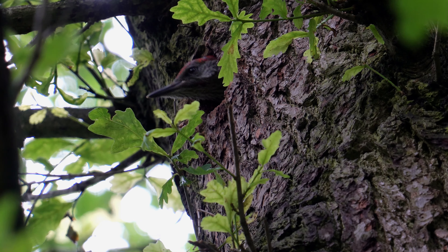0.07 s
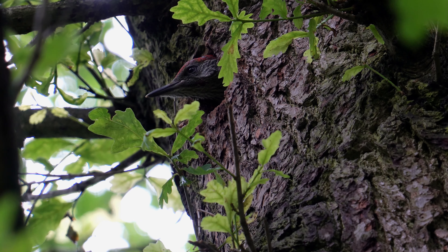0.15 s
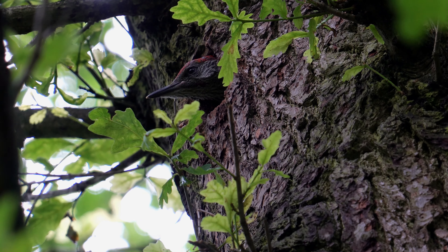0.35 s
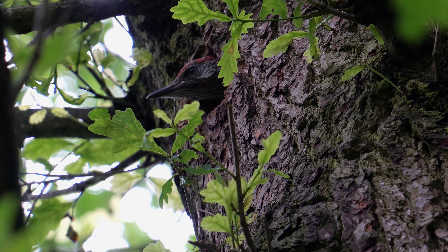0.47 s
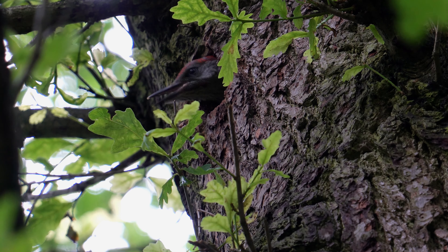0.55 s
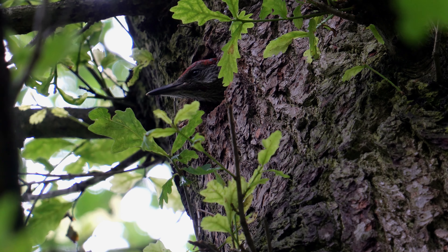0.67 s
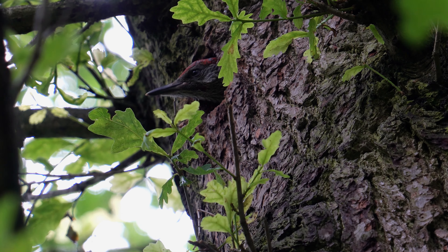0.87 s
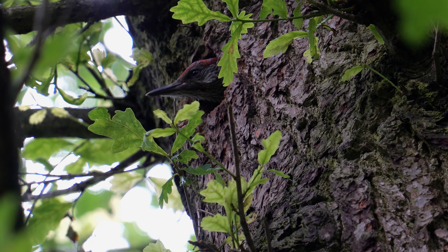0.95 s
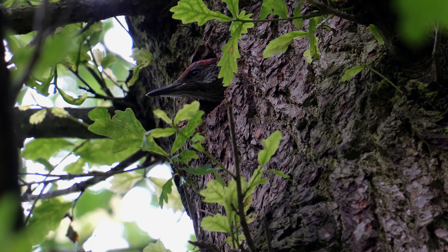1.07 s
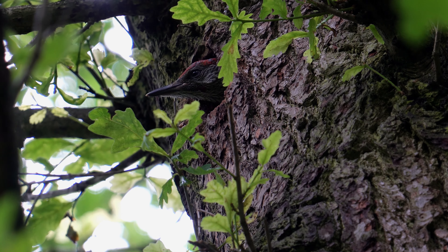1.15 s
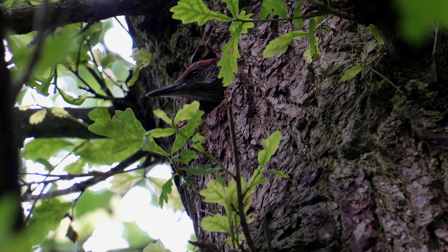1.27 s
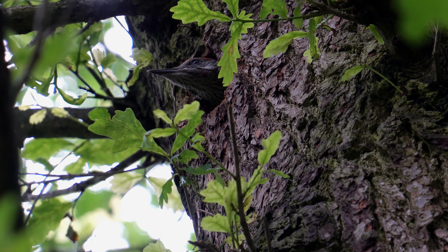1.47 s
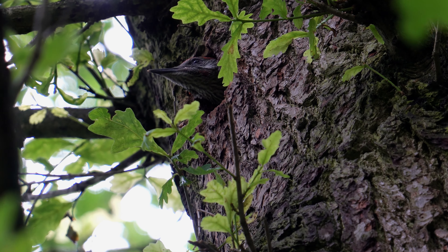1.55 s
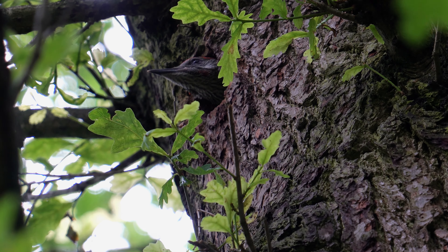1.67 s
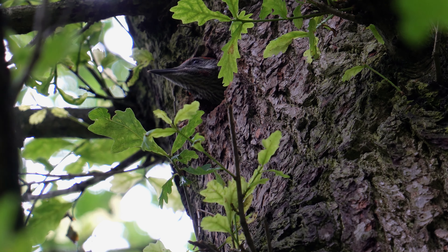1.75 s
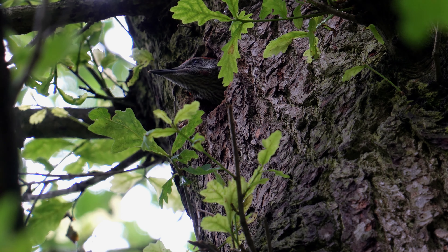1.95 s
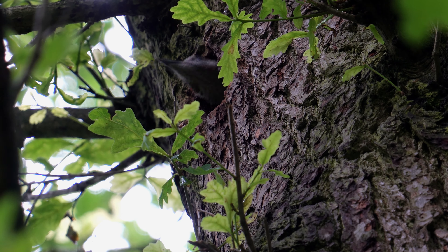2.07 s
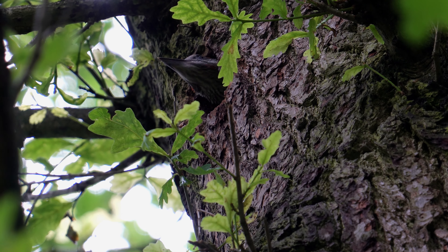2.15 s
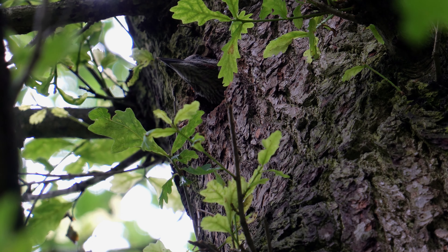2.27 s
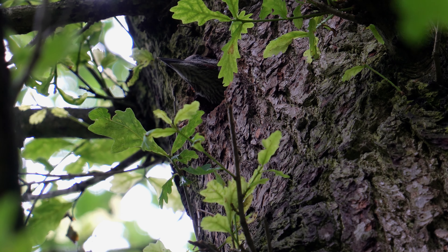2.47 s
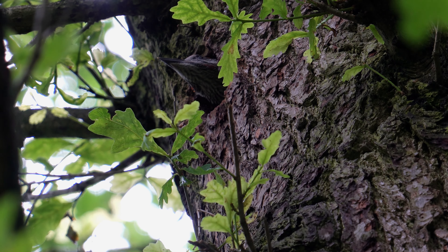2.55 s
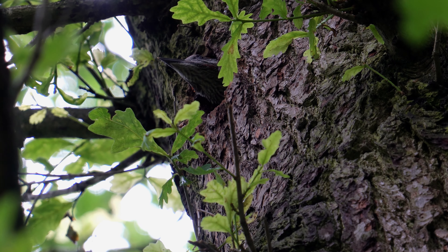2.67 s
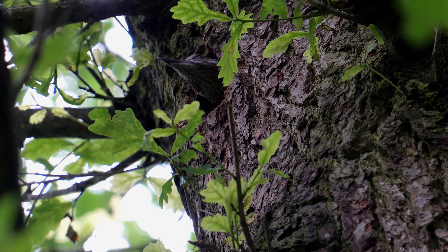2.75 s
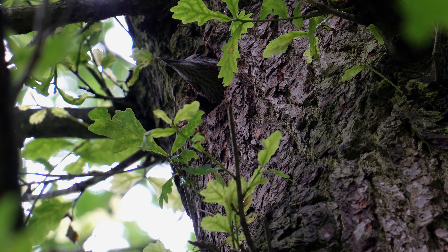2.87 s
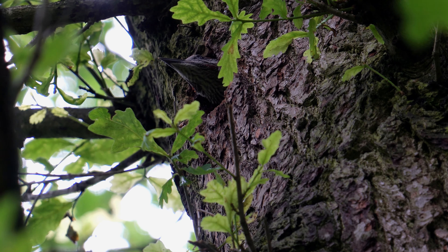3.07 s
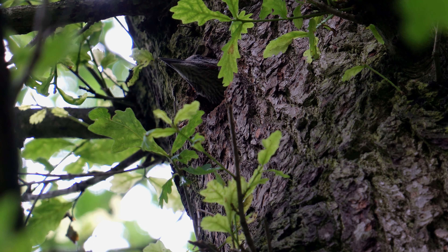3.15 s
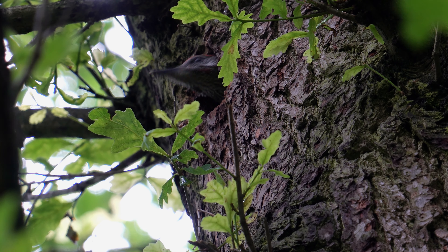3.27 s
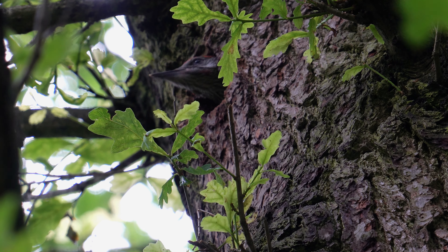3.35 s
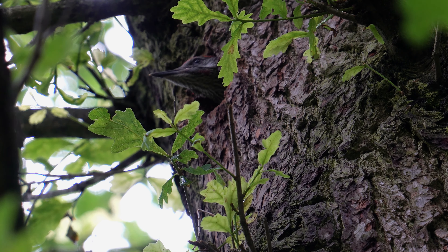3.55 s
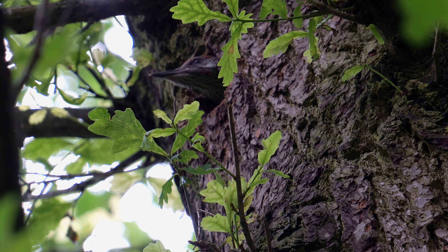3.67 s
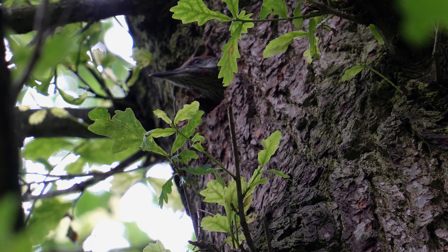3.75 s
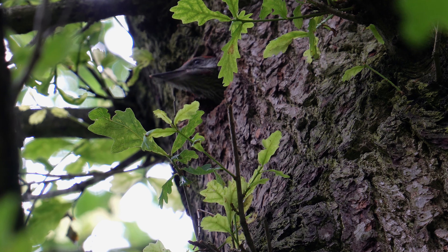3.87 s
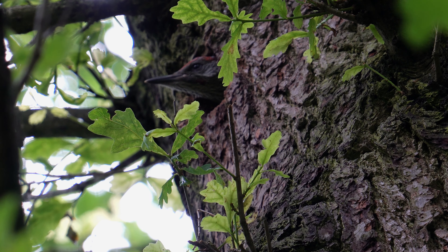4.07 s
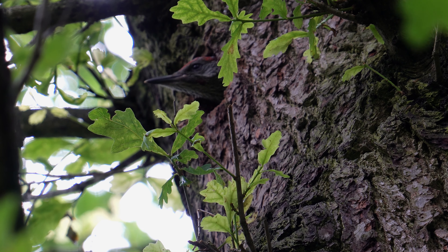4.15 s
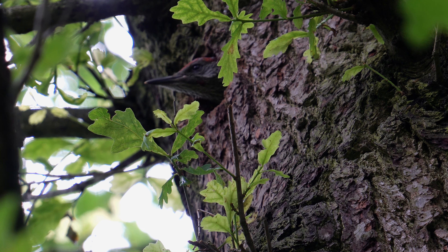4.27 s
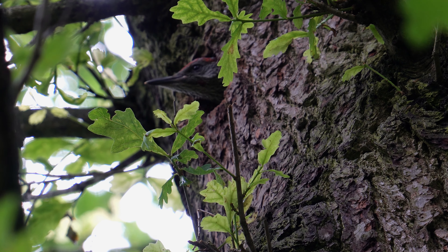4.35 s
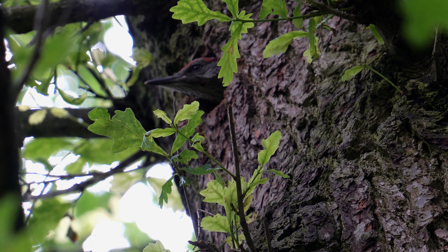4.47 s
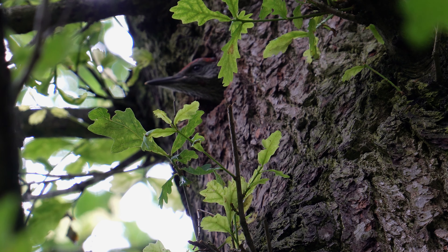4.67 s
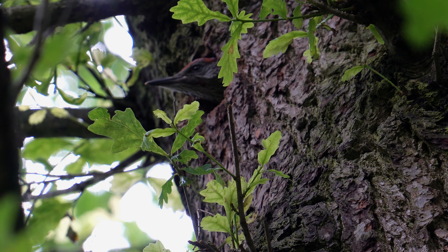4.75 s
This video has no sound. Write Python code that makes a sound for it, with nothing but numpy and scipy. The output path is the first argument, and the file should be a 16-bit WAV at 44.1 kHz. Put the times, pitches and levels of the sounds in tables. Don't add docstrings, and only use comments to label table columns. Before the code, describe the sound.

A young woodpecker in a tree hole gives thirteen loud, clipped begging calls, each a tiny rasp snapping into a clear piercing note that drops quickly. They come singly, unevenly spaced over nearly ten seconds, with short woodland echoes. Behind, songbirds flute, warble, slide and buzz, blurred by the trees. A soft broadband hush and a very faint low motor drone lie underneath. The chick is clear and fairly close; the other birds are farther off and wide.

```python
import sys
import numpy as np
from scipy import signal
from scipy.fft import rfft, irfft
from scipy.io import wavfile
from scipy.ndimage import uniform_filter1d

SR = 44100
rng = np.random.default_rng(int(sys.argv[2]) if len(sys.argv) > 2 else 0)


def dump_mix(stems):
    frames = np.atleast_2d(stems).T
    limited = np.clip(frames, -1, 1)
    pcm = np.round(limited * 32767).astype(np.int16)
    wavfile.write(sys.argv[1], SR, pcm)


def linear_from_db(decibels):
    return 10 ** (np.asarray(decibels, float) / 20)


N = 433944


def chick():
    # start of the clear tone in seconds, its pitch in Hz, pitch at the end of the hold in Hz,
    # peak level in dB, 2nd overtone (set by the gape) in dB.
    begging = [(0.073, 2410, 2343, -16, -6), (0.678, 2432, 2384, -14.5, -6.5),
               (1.474, 2382, 2002, -18, -5.5), (2.261, 2280, 2012, -21.5, 0), (3.448, 2238, 2298, -18, -4),
               (4.016, 2330, 2406, -16.5, -5.5), (5.185, 2330, 2064, -20.5, -7.5),
               (5.684, 2366, 2392, -18, -7.5), (6.288, 2395, 2290, -18, -14),
               (6.657, 2355, 2190, -16, -8.5), (7.1, 2257, 2250, -17, -6), (8.269, 2176, 2387, -16.5, -3),
               (8.846, 2223, 2420, -14, -7)]
    # 3rd overtone in dB, lift of the upper overtones in dB,
    # share sent to the trees in dB.
    aim = [(-16, -1, 2), (-22, -0.5, 2.5), (-20, -2.5, 3.5), (-18, 0.5, 2), (-17, -2, 3), (-11.5, 1.5, 2),
           (-20, 3.5, 2.5), (-9.5, 6, 3), (-13.5, 0, 4), (-22, -0.5, 2.5), (-17, 2.5, 3), (-16, 1, 4.5),
           (-15, -2.5, 3.5)]
    # hold in seconds, fall in seconds, opening rasp in dB, pace of the fall as share of usual.
    effort = [(0.021, .046, -26.5, 1.05), (.02, 0.057, -29, .95), (.02, .034, -27.5, 0.81),
              (0.021, .034, -27.5, .9), (.021, 0.0366, -29, 1.2), (.021, 0.054, -29, .95),
              (.02, 0.031, -28.5, 1.05), (.02, 0.053, -29, 1.05), (.02, .048, -28.5, 1.05),
              (0.019, 0.055, -27, 0.79), (.024, 0.048, -27, .95), (.024, 0.062, -30.5, .9),
              (0.02, 0.065, -28.5, .85)]
    # share of fall time, share of pitch drop, level in dB.
    fall_course = [(0, 0.03, -4), (0.15, .29, -8), (.4, .55, -11), (.65, .74, -16), (.85, .9, -24),
                   (1.25, 1.4, -38)]
    lead, usual_sag = 0.024, 18000
    direct, echoes, thrown = np.zeros(N), np.zeros((2, N)), np.zeros(N)
    share, sag, sag_db = np.transpose(fall_course)
    for event, head, strength in zip(begging, aim, effort):
        s, start_hz, end_hz, db, second_db = event
        third_db, lift_db, thrown_db = head
        hold, fall, rasp_db, pace = strength
        t = np.arange(round((lead + hold + share[-1] * fall) * SR)) / SR - lead
        knots = np.r_[-lead, -.006, 0, hold / 2, hold + share * fall]

        middle_hz = (start_hz + end_hz) / 2 * 1.0361
        falling_hz = end_hz - usual_sag * pace * fall * sag
        pitch = np.interp(t, knots, np.r_[.62 * start_hz, .83 * start_hz, start_hz, middle_hz, falling_hz])
        pitch = uniform_filter1d(pitch, size=90) * (1 + .007 * waver(N // 40, span=60)[:len(t)])
        phase = 2 * np.pi * np.cumsum(pitch) / SR

        tone = np.clip(t / 0.00094 + 1, 0, 1) * linear_from_db(np.interp(t, knots, np.r_[-9, -9, -4, 0, sag_db]))
        slackening = np.clip((t - hold) / fall * 3, 0, 1)
        tone *= linear_from_db(2 * slackening * waver(N // 40, span=110)[:len(t)])
        closed = np.interp(t, [0, hold * 0.6, hold, hold + fall / 2], [.5, 0, 3, 9])
        call = overtones(phase, tone, closed, second_db, third_db, lift_db)

        slack_s = [-lead, -.014, -.001, .008, hold + 0.038 * fall, hold + 1.35 * fall, t[-1]]
        slack_db = np.interp(t, slack_s, [-34, -8, 1, -10, -24, -20, -35])
        rasp, air = rasp_and_air(pitch, phase)
        call += linear_from_db(rasp_db - db + slack_db) * (rasp + linear_from_db(-19) * air)
        call += linear_from_db(-26) * tone * air
        call = linear_from_db(db) * call * fade(t + lead, t[-1] + lead, 0.00037)
        call = signal.sosfilt(signal.butter(3, [480, 14000], "band", fs=SR, output="sos"), call)
        add(direct, s - lead, call)

        call = call * linear_from_db(thrown_db + np.interp(t, [hold, hold + fall / 2], [0, -3]))
        add(thrown, s - lead, call)
        for ear, echo in zip(echoes, trunk_echoes(call)):
            add(ear, s - lead, echo)
    return direct, echoes, thrown


def overtones(phase, tone, closed, second_db, third_db, lift_db):
    upper_db = [-19, -26.5, -26]
    call = tone * np.sin(phase)
    for k, level_db in enumerate([second_db, third_db, *(lift_db + np.array(upper_db))], 2):
        beak_db = -1.5 * (k - 1) ** 0.61 * closed
        call += tone * linear_from_db(level_db + beak_db) * np.sin(k * phase + k)
    return call


def rasp_and_air(pitch, phase):
    # frequency in Hz, level in dB.
    throat = [(750, -6), (1200, -11), (2000, -3), (2800, 2), (3700, 4), (5000, -4), (8000, -14),
              (15000, -26)]
    count = len(phase)
    wobble = phase / 2 + .35 * np.cumsum(rng.standard_normal(count)) / 10
    rasp = np.zeros(count)
    for k in range(1, 15):
        rasp += linear_from_db(at_hz(throat, k * pitch / 2)) * np.cos(k * wobble + k ** 2 / 2)
    air = signal.lfilter([1, -1], [1, -.8], rng.standard_normal(count)) * (1 + np.sin(wobble))
    return rasp, air


def trunk_echoes(call):
    # delay in seconds, level in dB, spread in seconds.
    trunks = [
        (.0075, -14, 0.0006),
        (.016, -18, 0.0071),
        (0.051, -20, 0.003),
        (.075, -26, 0.025),
    ]
    t = np.arange(round(.1 * SR)) / SR
    shape = np.zeros(len(t))
    for lag, db, spread in trunks:
        shape += linear_from_db(db) * np.exp(-((t - lag) / spread) ** 2) / np.sqrt(spread * SR)
    mid, side = shape * rng.standard_normal((2, len(t))) * linear_from_db([[0], [-13]])
    return signal.fftconvolve(call[None], np.array([mid + side, mid - side]), axes=1)


def bark_lean(voice):
    treble = signal.sosfilt(signal.butter(2, 6000, "high", fs=SR, output="sos"), voice)
    return linear_from_db(-5) * np.roll(treble, round(.0004 * SR)) * [[1], [-1]]


def near_birds():
    # start in seconds, length in seconds, top in Hz, end in Hz, level in dB.
    fluting = [
        (0.58, 0.051, 2897, 2200, -50),
        (0.697, 0.081, 2297, 2245, -32.5),
        (1, 0.11, 2133, 1974, -35.5),
        (7.665, 0.077, 2130, 1960, -36.5),
        (7.94, 0.15, 2325, 2097, -33),
        (9.331, 0.074, 2200, 1760, -49),
        (0.49, 0.14, 8400, 6840, -56),
        (0.736, 0.14, 8400, 7560, -53),
    ]
    # start in seconds, length in seconds, start in Hz, end in Hz, level in dB.
    slides = [(7.29, .14, 2030, 1650, -45), (7.54, .055, 2010, 1980, -40), (7.59, .08, 1900, 1850, -39.5),
              (7.8, .055, 2800, 2200, -46), (7.835, .02, 2800, 2400, -45), (.29, .09, 8050, 8700, -59),
              (.9, .11, 7950, 8400, -63), (2.18, .04, 4600, 2700, -46), (2.805, .025, 3600, 3300, -49),
              (4.783, .008, 6600, 8700, -43), (8.55, .01, 5900, 8000, -44), (1.768, .005, 4100, 3600, -42),
              (1.8, .012, 5200, 3800, -44), (.2, .105, 1870, 1880, -39), (.375, .035, 1880, 1900, -39),
              (.415, .05, 1900, 1890, -41), (.48, .1, 1890, 1870, -43), (9.77, .045, 1950, 2100, -47.5),
              (9.755, .028, 1650, 1620, -48), (1.35, .035, 2400, 3000, -54), (1.385, .04, 2950, 2500, -56),
              (8.495, .035, 2700, 2890, -47), (8.515, .085, 2890, 2870, -44), (8.585, .07, 2870, 2870, -48)]
    # start in seconds, length in seconds, low pitch in Hz, high pitch in Hz, level in dB.
    warbles = [
        (.622, 0.042, 1810, 2800, -37.5),
        (1.09, 0.21, 1883, 2130, -35.5),
        (1.3, 0.22, 1786, 2200, -45),
    ]
    arches = [(s, length, 0.915 * top, top, end, db) for s, length, top, end, db in fluting]
    notes = arches + slurs(slides, .5)
    song = whistles(notes, edge=.015, tremor=.003, flicker_db=1.5)
    return song + trills(warbles, per_s=44, unevenness=0.414, shape=3.1)


def far_birds():
    # start in seconds, length in seconds, pitch in Hz, level in dB.
    held = [(0, 0.0078, 4080, -29.5), (0.662, 0.083, 7380, -48), (1.366, 0.085, 3710, -45),
            (1.555, 0.12, 5870, -42), (1.701, 0.17, 5946, -40.5), (1.883, 0.18, 4050, -43.5),
            (2.151, 0.11, 7510, -39.5), (2.45, 0.29, 7350, -60), (2.626, 0.083, 8390, -46.5),
            (2.702, 0.22, 3753, -52), (3.012, 0.14, 7270, -55), (3.301, 0.066, 5350, -45),
            (3.617, 0.49, 8680, -52.5), (4.118, 0.14, 5850, -42.5), (4.198, 0.15, 6480, -54),
            (4.252, 0.098, 3974, -48), (4.293, 0.084, 8000, -56), (4.437, 0.41, 7240, -57),
            (6.357, 0.32, 4940, -47.5), (6.726, 0.15, 4870, -46.5), (6.899, 0.26, 6810, -49.5),
            (7.729, 0.15, 6055, -42), (7.912, 0.12, 3130, -52), (8.08, 0.035, 7790, -52.5),
            (8.679, 0.011, 7340, -35), (8.734, 0.073, 6080, -40.5), (9.006, 0.16, 4930, -40)]
    # start in seconds, length in seconds, start in Hz, end in Hz, level in dB.
    falling = [(.1, 0.075, 7260, 5680, -40), (1.17, 0.19, 7800, 6870, -48),
               (2.11, 0.042, 8020, 7100, -39.5), (2.48, 0.1, 5820, 5400, -39),
               (1.67, 0.0029, 7960, 6130, -35), (1.852, 0.0028, 8100, 6350, -35.5),
               (2.62, .1, 7400, 7000, -49.5), (3.57, 0.034, 9200, 7300, -39.5),
               (3.77, 0.0082, 9000, 7140, -33.5), (4.1, 0.036, 6400, 5750, -35.5),
               (4.56, 0.056, 5570, 4220, -46), (4.68, 0.053, 6430, 5370, -39.5),
               (4.76, 0.014, 5680, 4200, -34), (5.59, 0.1, 8160, 7130, -43),
               (5.89, 0.056, 4740, 4410, -41.5), (6.07, 0.098, 4310, 3530, -47),
               (6.42, 0.11, 7200, 6640, -42.5), (6.72, 0.2, 7280, 6710, -45),
               (7.01, 0.074, 5660, 4370, -35.5), (7.11, 0.12, 4430, 3580, -48),
               (7.69, 0.051, 7900, 5950, -43.5), (8.11, 0.14, 5540, 3990, -43),
               (8.33, 0.038, 5530, 4540, -34.5), (8.59, 0.058, 4430, 3720, -40.5),
               (8.7, 0.03, 7370, 6040, -44), (9.15, 0.088, 7770, 7420, -42.5)]
    # start in seconds, length in seconds, start in Hz, end in Hz, level in dB.
    rising = [(.02, 0.04, 7280, 7730, -36.5), (1.12, 0.051, 7280, 7800, -36),
              (2.02, 0.058, 4670, 5340, -37.5), (2.85, 0.064, 4440, 5730, -44),
              (3.35, 0.021, 6370, 8400, -38), (4.58, 0.032, 5980, 6670, -36.5),
              (5.54, 0.042, 7030, 7840, -37.5), (5.98, 0.035, 5600, 6260, -39),
              (6.18, 0.0336, 5150, 5770, -38), (9.52, 0.064, 6000, 7340, -41),
              (9.62, 0.056, 3930, 5050, -39), (9.7, 0.04, 7100, 7940, -37)]
    # start in seconds, length in seconds, low pitch in Hz, high pitch in Hz, level in dB.
    buzzes = [
        (.18, 0.96, 4358, 5800, -39.5),
        (3.55, 0.45, 4090, 5490, -44.5),
        (4.8, 0.78, 4186, 5787, -40),
        (7.25, 0.44, 3490, 4466, -48),
    ]
    level_notes = [(s, length, hz, hz, hz, db) for s, length, hz, db in held]
    notes = level_notes + slurs(falling, 0.57) + slurs(rising, .65)
    song = whistles(notes, edge=0.0039, tremor=.009, flicker_db=0.5)
    return song + trills(buzzes, per_s=112, unevenness=.3, shape=1)


def slurs(notes, bend):
    return [(s, length, a, a + bend * (b - a), b, db) for s, length, a, b, db in notes]


def whistles(notes, edge, tremor, flicker_db):
    out = np.zeros(N)
    for s, length, start_hz, middle_hz, end_hz, db in notes:
        t = np.arange(round(length * SR)) / SR
        curve = np.polyfit([0, length / 2, length], [start_hz, middle_hz, end_hz], deg=2)
        pitch = np.polyval(curve, t) * (1 + tremor * waver(count=30000, span=300)[:len(t)])
        flicker = flicker_db * waver(count=30000, span=500)[:len(t)]
        level = linear_from_db(db + flicker) * fade(t, length, min(edge, length / 3))
        add(out, s, level * np.sin(2 * np.pi * np.cumsum(pitch) / SR))
    return out


def trills(notes, per_s, unevenness, shape):
    out = np.zeros(N)
    for s, length, low_hz, high_hz, db in notes:
        t = np.arange(round(length * SR)) / SR
        pace = per_s * (1 + unevenness * waver(count=60000, span=400)[:len(t)])
        sweep = (1 + signal.sawtooth(2 * np.pi * np.cumsum(pace) / SR, .3)) / 2
        pitch = high_hz - (high_hz - low_hz) * uniform_filter1d(sweep, size=70) ** shape
        level = linear_from_db(db) * fade(t, length, min(.05, length / 4))
        add(out, s, level * np.sin(2 * np.pi * np.cumsum(pitch) / SR))
    return out


def wood(x, direct_db, scatter_db, side_db, treble_side_db, rise, t60, high_t60):
    t = np.arange(2 * SR) / SR
    noise = rng.standard_normal((2, len(t)))
    noise = signal.sosfilt(signal.butter(2, 11000, fs=SR, output="sos"), noise)
    low = signal.sosfilt(signal.butter(2, 5000, fs=SR, output="sos"), noise)
    high = (noise - low) * linear_from_db([[0], [treble_side_db]])
    tail = low * linear_from_db(-60 * t / t60) + high * linear_from_db(-60 * t / high_t60)
    tail *= 1 - np.exp(-(t / rise) ** 2)
    tail /= np.sqrt(np.sum(tail[0] ** 2))
    mid, side = tail * linear_from_db(np.array([[0], [side_db]]) + scatter_db)
    scattered = signal.fftconvolve(x[None], np.array([mid + side, mid - side]), axes=1)[:, :N]
    return linear_from_db(direct_db) * x + scattered


def chorus():
    # time in seconds, level in dB.
    swell = [(0, -45), (.3, -62), (1.3, -54), (1.9, -49), (4.3, -52), (6.8, -51.5), (7.4, -63), (8.05, -71),
             (8.5, -48.5), (9.84, -54)]
    band = signal.butter(5, [4200, 6600], "band", fs=SR, output="sos")
    hiss = signal.sosfilt(band, rng.standard_normal((2, N)))
    return linear_from_db(np.interp(np.arange(N) / SR, *np.transpose(swell))) * hiss / hiss.std()


def hum():
    # frequency in Hz, level in dB per Hz.
    spectrum = [(20, -52), (45, -23), (80, -20), (170, -17.5), (230, -9.5), (460, 0.5), (920, 4),
                (1850, -4), (2800, -14.5), (3800, -20), (7500, -24.5), (9400, -29.5), (14300, -30),
                (16000, -32)]
    # frequency in Hz, side level over mid in dB.
    spaciousness = [(60, -21), (110, -23), (200, -15.5), (380, -15), (700, -10), (1290, -7.5), (2380, -5),
                    (4400, 1), (8120, 0), (15000, -2)]
    # frequency in Hz, left level over right in dB.
    tilt = [(60, -2), (110, -1), (200, -0.5), (380, -1), (700, -3.5), (1290, -2), (2380, -2.5), (4400, 5.5),
            (8120, -1), (15000, 1.5)]
    hz = np.fft.rfftfreq(N, 1 / SR)
    mid, side = rfft(rng.standard_normal((2, N))) * linear_from_db(at_hz(spectrum, hz))
    side = side * linear_from_db(at_hz(spaciousness, hz) - 0.5) * np.minimum(hz / 130, 1) ** 2
    lean = linear_from_db(at_hz(tilt, hz) / 2 * np.minimum(hz / 200, 1) ** 2)
    both = irfft(np.array([(mid + side) * lean, (mid - side) / lean]), N)
    return linear_from_db(-46) * both / np.sqrt(np.mean(both.mean(axis=0) ** 2))


def engine():
    # time in seconds, level in dB.
    drone_course = [(0, -87), (2.6, -77), (4.1, -106), (5.398, -75.5), (7.9, -76.5), (9.5, -71),
                    (9.84, -72)]
    # multiple of the turning rate, level in dB.
    orders = [(2, -80.5), (3, -72), (4, -66.5), (6, -61.5)]
    band = signal.butter(2, [62, 90], "band", fs=SR, output="sos")
    drone = signal.sosfilt(band, rng.standard_normal(N))
    drone_db = np.interp(np.arange(N) / SR, *np.transpose(drone_course)) - 3.0
    turning = 2 * np.pi * np.cumsum(78 * (1 + 0.0117 * waver(N, span=9000))) / SR
    tones = sum(linear_from_db(db) * np.sin(k * turning) for k, db in orders)
    return linear_from_db(drone_db) * drone / drone.std() + tones


def at_hz(points, hz):
    known_hz, db = np.transpose(points)
    return np.interp(np.log(hz + 1e-9), np.log(known_hz), db)


def add(track, s, sound):
    i = round(s * SR)
    track[i:i + len(sound)] += sound[:N - i]


def fade(t, length, edge):
    return np.sin(np.pi / 2 * np.clip(np.minimum(t, length - t) / edge, 0, 1)) ** 2


def waver(count, span):
    smooth = uniform_filter1d(rng.standard_normal(count), size=span)
    return uniform_filter1d(smooth, size=span) * np.sqrt(1.5 * span)


def scene():
    voice, echoes, thrown = chick()
    thrown = signal.lfilter([1, -.9], [1], thrown)
    trees = echoes + wood(thrown, direct_db=-90, scatter_db=-11.5, side_db=-16.5, treble_side_db=15.0,
                          rise=.055, t60=0.75, high_t60=0.67)
    trees += wood(near_birds(), direct_db=0, scatter_db=-10, side_db=-13.0, treble_side_db=17.5,
                  rise=0.0027, t60=1.1, high_t60=0.43)
    trees += wood(far_birds(), direct_db=-13, scatter_db=-0.5, side_db=-6.5, treble_side_db=5.0,
                  rise=0.0051, t60=1.15, high_t60=.95)
    left = linear_from_db([[.1], [-.1]])
    return voice + bark_lean(voice) + left * trees + chorus() + hum() + engine()


def band_limit(x):
    return signal.sosfilt(signal.butter(12, 15850, fs=SR, output="sos"), x)


def record(dry):
    return band_limit(dry)


dry = scene()
out = record(dry)
dump_mix(out)
```